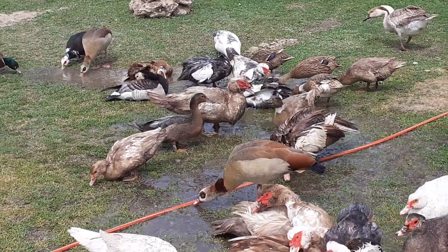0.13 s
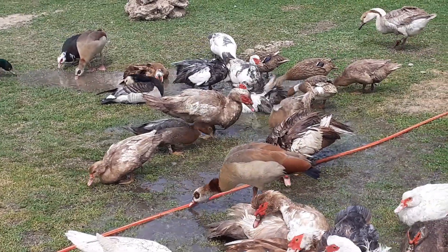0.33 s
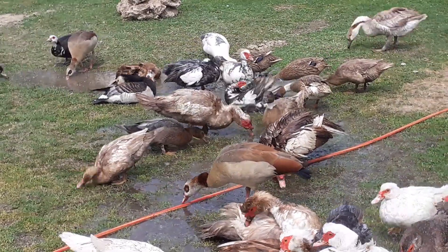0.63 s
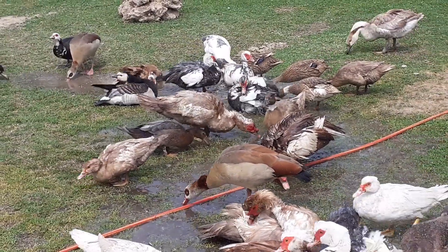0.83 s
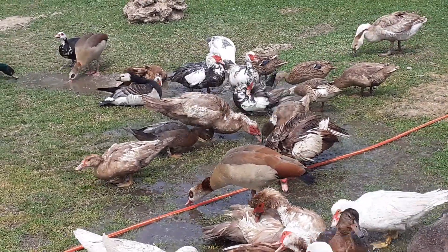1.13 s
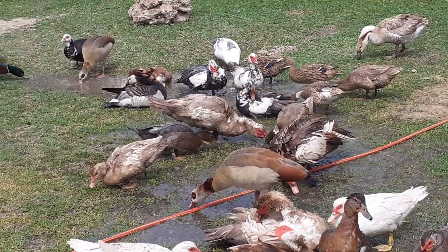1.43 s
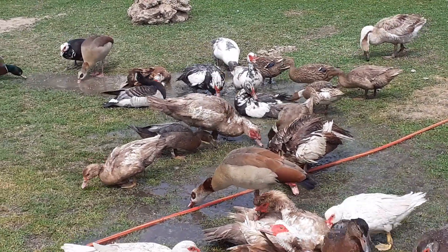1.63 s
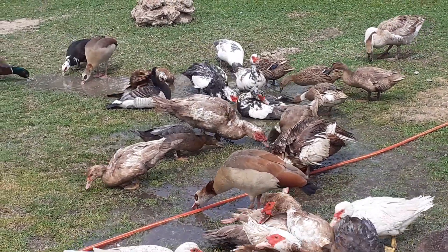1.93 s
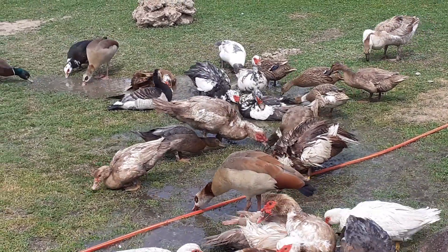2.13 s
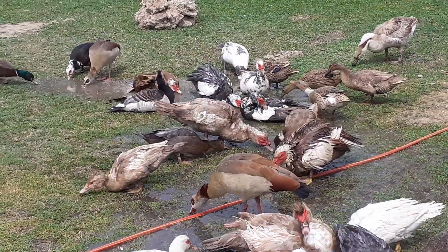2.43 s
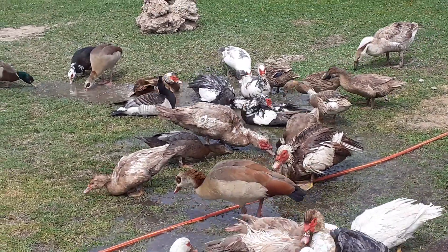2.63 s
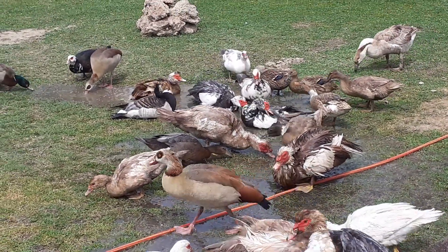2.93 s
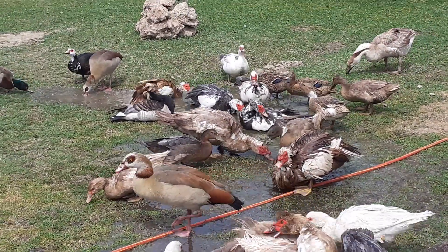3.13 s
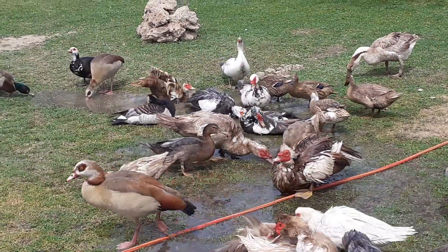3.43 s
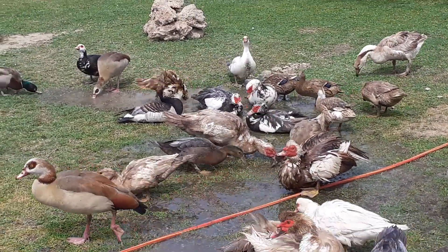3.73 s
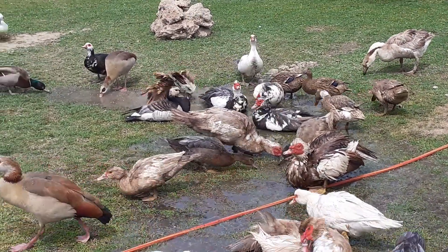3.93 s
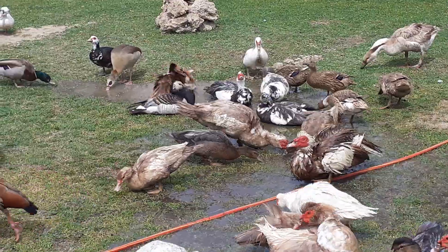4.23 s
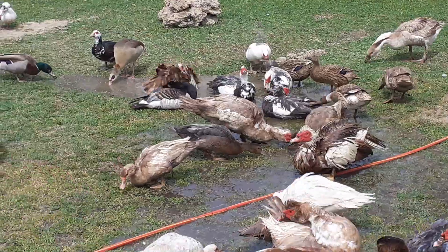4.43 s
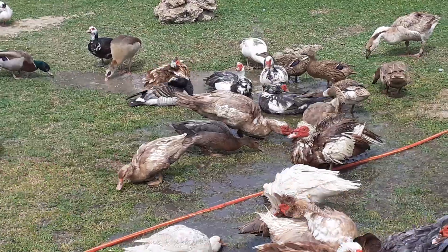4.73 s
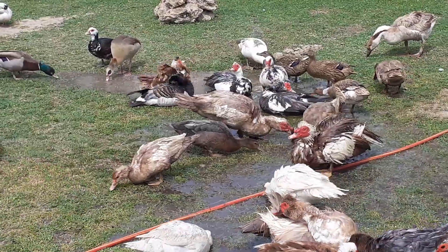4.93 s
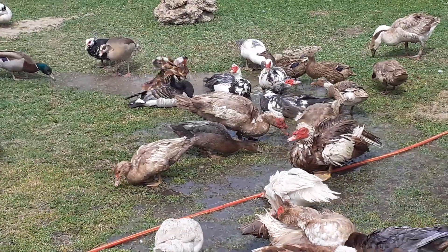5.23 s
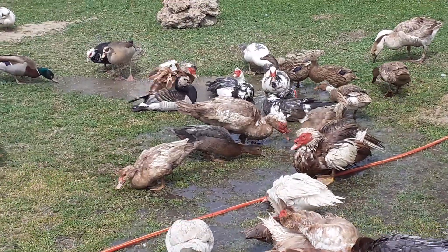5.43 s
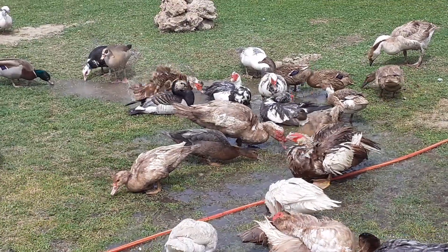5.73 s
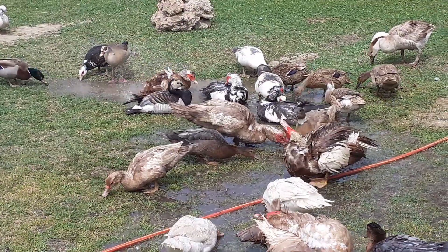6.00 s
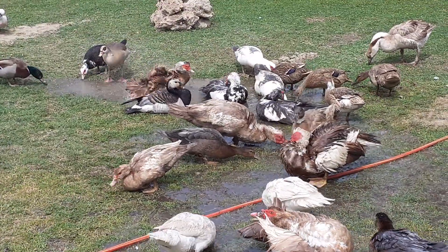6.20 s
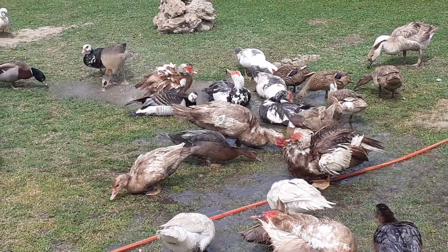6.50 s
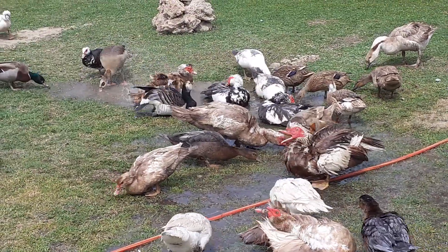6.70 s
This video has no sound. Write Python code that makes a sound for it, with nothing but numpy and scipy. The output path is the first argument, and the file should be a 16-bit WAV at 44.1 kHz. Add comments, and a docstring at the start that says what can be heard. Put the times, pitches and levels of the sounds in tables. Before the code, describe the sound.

A harsh rustling, wind-buffeted burst gives way to quiet wet bill ticking, small bubbles, and a bird splashing in a puddle.

```python
"""Ducks and geese dabble in a muddy puddle on a lawn: grains of noise tick and rising bubbles plip.
Bills click as ringing ticks, feet slap mud, one bird bathes in puffs of noise; soft calls ring in two resonances.
At first a loud crackling rustle of snaps swells close by and dies away, while wind thumps on the microphone
ports as turbulent noise and short pressure swings. Far traffic, a slow swell of coloured noise, lies behind."""
import sys
import numpy as np
from scipy import signal
from scipy.fft import rfft, irfft, next_fast_len
from scipy.io import wavfile
from scipy.ndimage import map_coordinates

SR = 44100
rng = np.random.default_rng(int(sys.argv[2]) if len(sys.argv) > 2 else 0)


def to_wav(sig):
    """Store sig (one row per channel, or 1-D mono) as 16-bit WAV at the path in sys.argv[1].

    Samples outside -1..1 are clipped; the rate is SR.
    """
    pcm = np.clip(np.atleast_2d(sig), -1, 1) * 32767
    pcm = np.round(pcm).astype(np.int16)
    wavfile.write(sys.argv[1], SR, pcm.T)  # frames by channels


N = 302526
TOP_HZ = 16050  # upper band limit

# The flock's dabbling. Each row: time in seconds, relative level in dB.
DABBLE_LEVEL = [(1.5, -63), (1.85, -60.5), (2.1, -56.5), (2.9, -54), (4.4, -52), (6.86, -49.5)]
# Spectrum of the wet ticking. Each row: frequency in Hz, relative level in dB.
MUD_COLOUR = [(300, -14), (800, -2.5), (1500, 0.5), (2300, 2), (3300, -1.5), (4500, -1.5), (6800, 2.5),
              (8800, -10.5), (10500, -6), (13000, -2), (16000, -14)]


def dabbling():
    """Granular noise and bubble resonance: bills sieve mud with steady ticking; bubbles and plops come in bouts."""
    level_db, = curves(DABBLE_LEVEL)
    bouts = unit(amp(2.4 * wobble(16)))
    contacts = grains(rate=300, life=.001, spread_db=2.5)
    ticking = mottled(airborne(MUD_COLOUR, contacts), depth_db=3.5, width_hz=892)
    bubbles = droplets(rate=200, centre_hz=3335, cycles=5.5, spread_db=3.5)
    plops = droplets(rate=70, centre_hz=2010, cycles=3.2, spread_db=3.5)
    water = amp(-6) * bubbles + amp(-9.5) * plops
    return amp(level_db) * (amp(-1.0) * ticking + bouts * water)


def droplets(rate, centre_hz, cycles, spread_db):
    """Bubble resonance: tiny bubbles ring and rise in pitch, each from its own spot in the puddle; rms 1."""
    out, t = np.zeros((2, N)), np.arange(SR // 60) / SR
    for when, pitch, size, place, life in rng.random((int(rate * N / SR), 5)):
        hz = centre_hz * 2 ** (2 * pitch - 1)
        delay = np.array([[place], [1 - place]]) * 0.0004  # seconds to each port
        age = np.maximum(t - delay, 0)
        turns = hz * age * (1 + 12 * age)
        plip = np.sin(2 * np.pi * turns) * np.exp(-turns / (cycles * (.5 + life)))
        gain = amp(-spread_db * np.log(size + 0.079)) * sides(6 * (.5 - place))
        add(out, when * N / SR, gain * plip)
    return unit(out)


# The nearest bill snaps. Each row: start in seconds, relative peak in dB, ring in Hz.
NEAR_BILLS = [(1.575, -34, 5000), (1.595, -28, 6500), (2.231, -37, 3030), (2.568, -38, 4800),
              (2.7, -39, 9200), (3.023, -39, 3330), (3.273, -33, 4070), (3.528, -37.5, 3200),
              (3.607, -37.5, 3650), (3.83, -26.5, 13100), (4.127, -33, 6100), (4.644, -30, 6700),
              (5.204, -25, 5000), (5.578, -31, 5030), (5.949, -27, 4730)]
# Fainter snaps from the rest of the flock, levels on the same relative scale.
SNAPS_PER_S, SNAP_DB, SNAP_SPREAD_DB = 7, -40.5, 2
SNAP_HZ, SNAP_OCTAVES, SNAP_PAN_DB = 5200, 0.65, 3.5  # pitch, its spread, and the pan spread of all snaps


def bills():
    """Cavity resonance: a wet bill snaps shut with a broad tick that rings briefly in its cavity."""
    out, count = np.zeros((2, N)), int(SNAPS_PER_S * N / SR)
    times = rng.uniform(0, N / SR, count)
    faint = [(s, SNAP_DB + SNAP_SPREAD_DB * size, SNAP_HZ * 2 ** (SNAP_OCTAVES * pitch))
             for s, (size, pitch) in zip(times, rng.standard_normal((count, 2)))]
    for s, db, hz in [*NEAR_BILLS, *faint]:
        pan = sides(SNAP_PAN_DB * rng.standard_normal())
        add(out, s, amp(db + 3) * pan * snap(0.0018, hz, q=5.0, broad=0.097))
    return out


# Single splashes of wings and feet. Each row: time of the height in seconds, level in dB, half length in seconds.
SPLASHES = [(4.83, -48.5, 0.06), (5.029, -44, 0.054), (5.204, -43.5, 0.04)]
# Spectrum of the spray. Each row: frequency in Hz, relative level in dB.
WATER_COLOUR = [(300, 0.5), (800, 6.5), (1500, -2), (2300, 0.5), (3700, -1.5), (5200, 3.5), (6800, -1.5),
                (8800, -12), (10500, -9), (13000, -3.5), (16000, -10)]
# The bathing bird beats its wings evenly.
BATH_START_S, STROKE_EVERY_S, STROKE_COUNT = 5.35, .118, 13
STROKE_DB, STROKE_SPREAD_DB, STROKE_HALF_S = -42.5, 1.4, 0.028


def bathing():
    """Amplitude-modulated spray noise: single splashes, then even wing strokes that each throw up a puff."""
    t = clock()
    strokes = []
    for k in range(STROKE_COUNT):
        stroke_db = STROKE_DB + STROKE_SPREAD_DB * rng.standard_normal()
        strokes.append((BATH_START_S + k * STROKE_EVERY_S, stroke_db, STROKE_HALF_S))
    power = sum(amp(db) ** 2 * np.exp(-((t - s) / half) ** 2) for s, db, half in [*SPLASHES, *strokes])
    drops = grains(rate=1400, life=0.00082, spread_db=1.5)
    spray = mottled(airborne(WATER_COLOUR, drops), depth_db=3.5, width_hz=940)
    return np.sqrt(power) * spray * sides(-0.31)


# Soft calls. Each row: time of the height in seconds, relative level in dB, lower throat resonance in Hz,
# half length in seconds.
SOFT_CALLS = [(1.957, -47.5, 560, .023), (2.178, -50, 570, .024), (2.387, -48.5, 570, .021),
              (3.813, -49.5, 1330, .019), (5.628, -48.5, 1330, .02)]
UPPER_RATIO, UPPER_DB, THROAT_WIDTH_HZ = 1.29, -3.5, 140  # second resonance over the first; filter width


def calls():
    """Source and filter: uneven throat pulses and air pass two resonances, which rise as the bill opens."""
    out, t = np.zeros((2, N)), np.arange(-SR // 8, SR // 8) / SR
    for s, db, hz, half in SOFT_CALLS:
        cycle = np.cumsum(140 * (1 + rng.standard_normal(len(t)))) / SR  # about 140 pulses a second
        pulses = unit(np.diff(np.floor(np.maximum.accumulate(cycle)), prepend=0))
        source = pulses + .45 * rng.standard_normal((2, len(t)))
        throats = [signal.iirpeak(f, max(f / THROAT_WIDTH_HZ, 1), SR) for f in (hz, hz * UPPER_RATIO)]
        # each resonance is applied twice
        lower, upper = [unit(signal.lfilter(*throat, signal.lfilter(*throat, source))) for throat in throats]
        voice = unit(lower + amp(UPPER_DB) * upper)
        rising = np.array([np.interp(t + .9 * t ** 2, t, v) for v in voice])  # plays ever faster
        add(out, s + t[0], amp(db - 0.5) * rising * np.exp(-(t / half) ** 2 / 2))
    return out


# Webbed feet slap the wet mud. Each row: start in seconds, relative level in dB.
SLAPS = [(1.966, -43.5), (3.386, -39.5)]
# Spectrum of a slap. Each row: frequency in Hz, relative level in dB.
SLAP_COLOUR = [(200, -8), (500, -2), (950, 0), (1350, -7), (2250, -1), (3400, -12), (4100, -10),
               (6000, -18), (14000, -22)]
SLAP_ATTACK_S, SLAP_DECAY_S = .002, .028


def footsteps():
    """Impact noise: a flat foot meets the mud with a sudden smack and a short spatter."""
    smack = 0
    for s, db in SLAPS:
        age = np.maximum(clock() - s, 0)
        smack = smack + amp(db) * (1 - np.exp(-age / SLAP_ATTACK_S)) * np.exp(-age / SLAP_DECAY_S)
    return smack * airborne(SLAP_COLOUR, grains(rate=900, life=.001, spread_db=2))


# The close rustle swells and dies away. Each row: time in seconds, relative level in dB.
RUSTLE_LEVEL = [(0, -41.5), (.55, -34), (.88, -33), (1.15, -39), (1.43, -44.5), (1.62, -56.5), (1.75, -90)]
# Its sharp crackles. Each row: start in seconds, relative peak in dB, decay time in seconds, ring in Hz.
CRACKLES = [(0.055, -19.5, 0.0052, 2250), (.125, -17.5, 0.0073, 7000), (0.138, -22.5, 0.013, 2300),
            (.177, -17.5, .0022, 5600), (.259, -23, 0.0032, 3900), (0.355, -19, 0.0023, 3600),
            (.514, -23.5, .0075, 1000), (0.652, -12.5, 0.00093, 2300), (0.678, -17, 0.0037, 4000),
            (.709, -15, .002, 12000), (.728, -15.5, 0.0036, 2520), (.835, -13.5, 0.0027, 2470),
            (0.862, -12.5, .0014, 13500), (.923, -17.5, 0.0093, 2250), (.944, -19, 0.0075, 3800),
            (1.045, -16.5, 0.0093, 2760), (1.067, -20, 0.0044, 13000), (1.174, -17.5, .007, 2280),
            (1.338, -23.5, .004, 5030), (1.409, -14, .0015, 5840)]
# Spectrum of the rustle's bed. Each row: frequency in Hz, relative level in dB.
RUSTLE_COLOUR = [(200, 9.5), (500, -1), (780, 3), (1200, -3.5), (2200, 1.5), (3600, -3.5), (5500, -2.5),
                 (7200, -4.5), (9000, -12.5), (11000, -10.5), (13200, -4.5), (16000, -13)]
# Side of the rustle. Each row: frequency in Hz, left over right in dB.
RUSTLE_SIDE = [(300, 2), (700, 2.5), (1300, -1.5), (2300, -3.5), (4400, 1), (7500, -1.5), (10000, -3.5),
               (15000, -8)]


def rustle():
    """Superposed impulses: dense tiny snaps of many pitches surge unevenly, with sharper crackles on top."""
    level_db, = curves(RUSTLE_LEVEL)
    crackles = np.zeros((2, N))
    for s, db, life, hz in CRACKLES:
        add(crackles, s, amp(db - 1.5) * snap(life, hz, q=2.2, broad=0.33))
    contacts = grains(rate=1100, life=0.00081, spread_db=3.0)
    bed = mottled(airborne(RUSTLE_COLOUR, contacts), depth_db=3.0, width_hz=904)
    specks = droplets(rate=420, centre_hz=3760, cycles=1.6, spread_db=3.0)  # very short rings
    surges = amp(level_db + 1.6 * wobble(45))
    sound = surges * (amp(0.4) * bed + amp(-9.5) * specks) + crackles
    return filtered(sound, lambda hz: sides(along(RUSTLE_SIDE, hz)))


# Single eddies that hit a port. Each row: time of the centre in seconds, relative peak in dB, pitch in Hz,
# left over right in dB.
THUMPS = [(.012, -21, 160, 8), (.132, -14.5, 196, -6.5), (.159, -19.5, 131, -12), (.236, -16.5, 151, -4),
          (.835, -15.5, 139, 12), (.883, -18, 117, 27), (1.089, -9, 230, 24), (1.108, -7, 162, 30),
          (1.127, -11.5, 167, 26), (1.197, -8.5, 166, 24), (1.233, -12.5, 220, 25), (1.244, -9, 134, 23),
          (1.269, -11.5, 132, 25), (1.326, -16.5, 157, -24), (1.365, -17, 168, 11), (1.561, -33.5, 240, 0),
          (1.769, -31, 111, 3), (1.983, -32.5, 117, -5), (2.218, -26, 97, 0), (2.422, -30.5, 84, 0),
          (2.478, -34, 75, 0), (2.75, -28, 126, -17), (2.976, -28.5, 108, -16), (3.12, -22, 137, -5.5),
          (3.151, -26.5, 135, -3), (3.223, -31.5, 101, 1), (3.38, -29, 210, 7), (3.547, -31.5, 107, -10),
          (4.602, -32, 115, 2), (5.158, -33, 150, -2), (5.205, -28, 189, -2), (5.228, -26, 170, -2),
          (5.303, -29.5, 343, 1), (5.314, -26, 260, -7), (5.882, -28, 109, -2.5), (5.99, -32, 86.5, 1),
          (6.625, -28.5, 91, 1)]
# Sudden sharp pops within some of the wind thumps. Each row: time of the centre in seconds,
# relative peak in dB, left over right in dB.
POPS = [(1.089, -16, 24), (1.233, -7, 28), (1.269, -7.5, 25), (5.303, -28, -2)]
EDDY_POP = 0.075  # share of sudden pop in every eddy


def thumps():
    """Vortex pressure: an eddy crossing a port swings the pressure and breaks into whirls; some blows pop."""
    out, t = np.zeros((2, N)), np.arange(-SR // 20, SR // 20) / SR
    jump = np.tanh(t / 0.00024) * np.exp(-(t / 0.00084) ** 2)
    for s, db, hz, pan_db in THUMPS:
        phase = rng.uniform(0, 2 * np.pi) + rng.normal(0, 0.83, (2, 1))  # differs between ports
        swing = np.cos(2 * np.pi * hz * t + phase) * np.exp(-np.hypot(t * hz, .15) / 0.44)
        band = signal.butter(2, [0.78 * hz, 2.03 * hz], "band", fs=SR, output="sos")
        whirls = unit(signal.sosfilt(band, rng.standard_normal((2, len(t)))))
        sound = swing + amp(-13.5) * whirls * np.exp(-(t / 0.0082) ** 2) + EDDY_POP * jump
        add(out, s + t[0], amp(db + 3.5) * sides(pan_db) * sound)
    for s, db, pan_db in POPS:
        add(out, s + t[0], amp(db) * sides(pan_db) * jump)
    return out


# The breeze between gusts. Each row: time in seconds, relative level in dB.
BREEZE = [(0, -32.5), (.45, -35.5), (1.36, -33), (1.5, -49), (1.85, -56), (2.38, -48.5), (2.54, -69),
          (2.68, -65), (2.95, -51), (3.42, -50.5), (3.66, -57.5), (4.25, -58.5), (4.75, -52), (5.75, -54),
          (6.15, -56), (6.86, -50.5)]
# Gusts on top of it. Each row: time of the height in seconds, relative level in dB, half length in seconds,
# left over right in dB.
GUSTS = [(0.022, -32, .04, 11), (0.203, -33, 0.11, 0), (.6, -34, .04, 16), (.87, -33, 0.11, 15),
         (1.127, -29.5, .05, 19), (1.247, -22, 0.036, 13), (1.313, -29, .03, -8), (1.37, -29.5, 0.027, 13),
         (1.44, -40, .025, -13), (2.88, -47, .025, 15), (3.11, -41, .05, 0.5), (3.375, -41, .03, -2),
         (5.209, -39, 0.037, -4.5), (5.317, -38, 0.038, -7), (6.596, -42.5, 0.088, 3.5)]
# Spectrum of the wind rumble. Each row: frequency in Hz, relative level in dB.
BUFFET_COLOUR = [(18, -45), (30, -8), (42, -1.5), (58, 3.5), (86, 3.5), (130, -1.5), (190, -7), (320, -10),
                 (450, -17), (700, -31), (1500, -47), (3000, -90)]


def wind():
    """Uncorrelated turbulence: each port rumbles on its own, and gusts may strike one port harder."""
    t = clock()
    breeze_db, = curves(BREEZE)
    gust_power = sum((amp(db) * sides(pan_db)) ** 2 * np.exp(-((t - s) / half) ** 2)
                     for s, db, half, pan_db in GUSTS)
    power = amp(breeze_db) ** 2 + gust_power
    rumble = unit(filtered(rng.standard_normal((2, N)), lambda hz: amp(along(BUFFET_COLOUR, hz))))
    quick = np.array([wobble(35), wobble(35)])
    slow = np.array([wobble(9), wobble(8.2)])
    lumps = unit(amp(2.7 * quick + 2.2 * slow))
    return amp(3.5) * np.sqrt(power) * lumps * rumble


# Spectrum of the far tyre noise. Each row: frequency in Hz, relative level in dB.
TYRE_COLOUR = [(60, -9.5), (200, 5), (450, -3.5), (700, 0.5), (920, 6.5), (1200, -6), (1800, -12.5),
               (4000, -22.5)]
# Spectrum of the quiet yard. Each row: frequency in Hz, relative level in dB.
YARD_COLOUR = [(25, 15), (80, -27), (350, 2), (600, -8), (1200, -12.5), (2500, -10), (6000, -11),
               (9000, -19.5), (13000, -16), (16000, -15)]
# Far traffic comes nearer, passes and starts to recede.
PASS_S, PASS_DB, PASS_WIDTH_S, FADE_DB_PER_S = 6.27, -48, 0.81, 5.5


def background():
    """Diffuse noise: the quiet air of the yard, and the tyre noise of far traffic, loudest as it passes."""
    distance = np.hypot(clock() - PASS_S, PASS_WIDTH_S) - PASS_WIDTH_S
    tyres_db = PASS_DB - FADE_DB_PER_S * distance
    air = airborne(YARD_COLOUR, amp(-53.5 + 0.5 * wobble(3.82)))
    return air + airborne(TYRE_COLOUR, amp(tyres_db + 1.2 * wobble(6.9)))


# Likeness of the two ports. Each row: frequency in Hz, left-right correlation from -1 to 1.
ALIKE = [(100, 0.86), (720, 0.79), (1400, -0.056), (2200, 0.69), (3500, 0.074), (5200, 0.15), (6500, -.4),
         (8500, 0.076), (15000, 0.016)]


def airborne(colour, envelope):
    """Spatial coherence: enveloped noise is coloured and heard by two spaced ports; rms follows the envelope."""
    grid = np.linspace(0, SR / 2, 2048)
    norm = np.sqrt(np.mean(amp(along(colour, grid)) ** 2 * (grid < TOP_HZ)))

    def mid_side(hz):
        turn = np.arccos(np.clip(along(ALIKE, hz), -1, 1)) / 2
        return amp(along(colour, hz)) / norm * [np.cos(turn), np.sin(turn)]

    mid, side = filtered(envelope * rng.standard_normal((2, N)), mid_side)
    return np.array([mid + side, mid - side])


def grains(rate, life, spread_db):
    """Poisson statistics: an rms 1 envelope of tiny soft-edged bursts, uneven in size, rate a second."""
    sizes = amp(spread_db * np.minimum(rng.exponential(size=N), 3))
    energy = (rng.random(N) < rate / SR) * sizes ** 2
    pole = np.exp(-1 / (0.91 * life * SR))
    spread = signal.filtfilt([1], [1, -pole], energy, padtype=None)  # rises and decays alike
    return unit(np.sqrt(np.abs(spread)))


def mottled(x, depth_db, width_hz):
    """Time-varying spectrum: every few milliseconds the contact changes, and with it the colour."""
    z = signal.stft(x, nperseg=256)[2]
    rows, cols = np.indices(z.shape[1:])
    places = [rows * SR / 256 / width_hz, cols / 4]
    field = map_coordinates(rng.standard_normal(z.shape[1:]), places, order=1, mode="wrap")
    gain = unit(amp(depth_db * np.clip(unit(field), -2, 2)))
    return signal.istft(z * gain, nperseg=256)[1][:, :N]


def snap(life, hz, q, broad):
    """Impulse and resonance: a peak 1 tick rings briefly, at times reaching one port slightly later."""
    t = np.arange(SR // 25) / SR
    noise = rng.standard_normal(len(t)) + 0.53 * rng.standard_normal((2, len(t)))
    tick = np.tanh(noise) * np.exp(-t / life) * (1 - np.exp(-t / (0.094 * life)))
    ring = signal.lfilter(*signal.iirpeak(min(hz, TOP_HZ), q, SR), tick)
    left, right = ring + broad * tick
    late_left, late_right = rng.choice([0, 0, 18]), rng.choice([0, 2, 3])  # samples
    pair = np.array([np.roll(left, late_left), np.roll(right, late_right)])
    return pair / np.abs(pair).max()


def amp(db):
    """Logarithmic level: decibels to gain."""
    return 10 ** (np.asarray(db) / 20)


def unit(x):
    """Mean power: scale to rms 1."""
    return x / np.sqrt(np.mean(x ** 2) + 1e-20)


def along(points, hz):
    """Logarithmic frequency: (Hz, value) points joined on a log axis."""
    f, v = np.transpose(points)
    return np.interp(np.log(hz + 1), np.log(f + 1), v)


def clock():
    """Uniform sampling: the time of each sample in seconds."""
    return np.arange(N) / SR


def curves(rows):
    """Linear interpolation: one value per sample for each column after the time."""
    s, *cols = np.transpose(rows)
    return [np.interp(clock(), s, c) for c in cols]


def wobble(rate):
    """Slow random modulation: a smooth curve through rate random knots a second."""
    return map_coordinates(rng.standard_normal(int(N * rate / SR) + 4), [clock() * rate])


def filtered(x, response):
    """Linear filtering: the spectrum of x times a response of frequency."""
    m = next_fast_len(N + SR // 4)
    return irfft(rfft(x, m) * response(np.fft.rfftfreq(m, 1 / SR)), m)[..., :N]


def sides(pan_db):
    """Constant-power panning: left and right gains for a left over right level in dB."""
    g = amp(np.array([np.atleast_1d(pan_db), -np.atleast_1d(pan_db)]) / 2)
    return g / np.sqrt(np.mean(g ** 2, axis=0))


def add(track, s, sound):
    """Superposition: mix a stereo sound into the track at time s."""
    part = track[:, max(round(s * SR), 0):][:, :sound.shape[1]]
    part += sound[:, :part.shape[1]]


# Side of the dabbling and bathing. Each row: frequency in Hz, left over right in dB.
BIRD_SIDE = [(1000, 1.0), (2400, -1.0), (6000, 0.2), (14000, -3.5)]


def scene():
    """Superposition: birds and yard, with the wind on top."""
    puddle = filtered(dabbling() + bathing(), lambda hz: sides(along(BIRD_SIDE, hz)))
    birds = puddle + bills() + footsteps() + calls()
    return birds + rustle() + background() + wind() + thumps()


def record(dry):
    """Band limiting: peaks clip at full scale, then the deepest rumble and all above the limit are cut."""
    clipped = np.clip(dry, -1, 1)
    return filtered(clipped, lambda hz: (hz < TOP_HZ) * hz ** 4 / (hz ** 4 + 36 ** 4))


dry = scene()
out = record(dry)
to_wav(out)
```